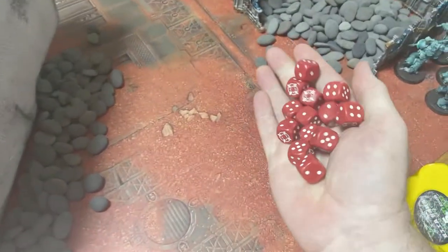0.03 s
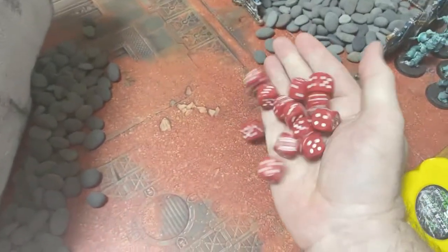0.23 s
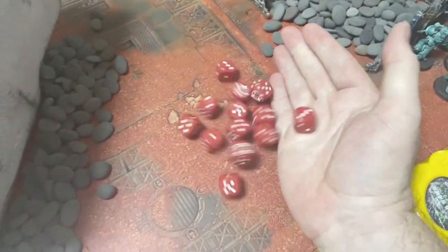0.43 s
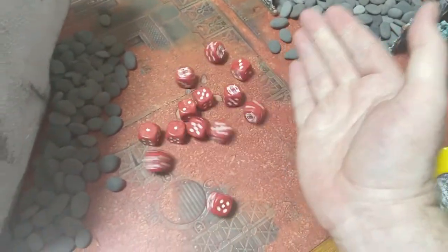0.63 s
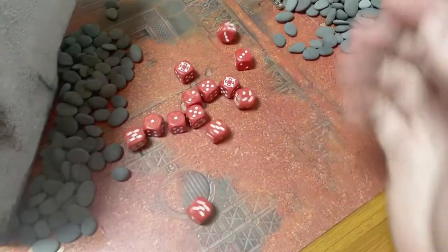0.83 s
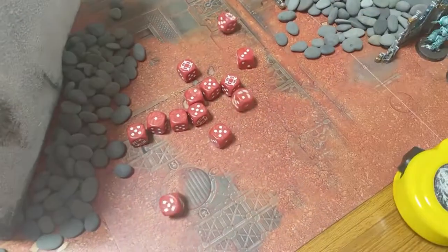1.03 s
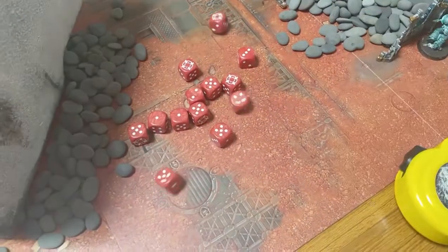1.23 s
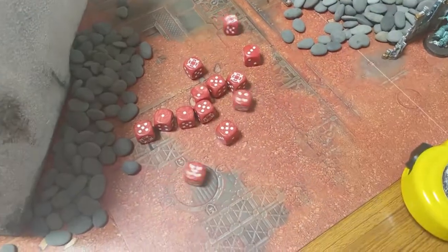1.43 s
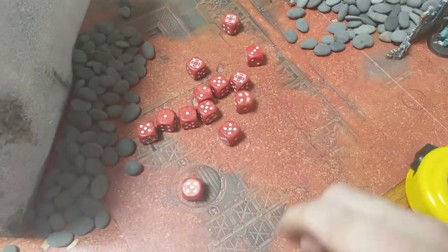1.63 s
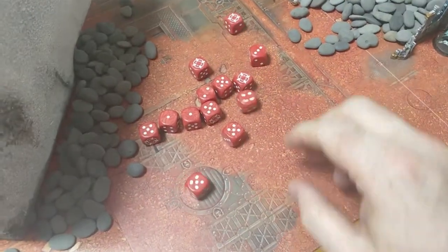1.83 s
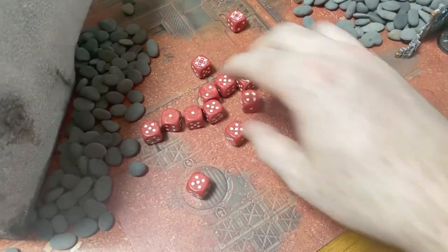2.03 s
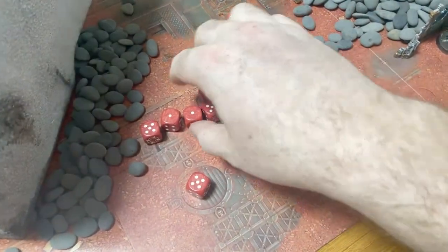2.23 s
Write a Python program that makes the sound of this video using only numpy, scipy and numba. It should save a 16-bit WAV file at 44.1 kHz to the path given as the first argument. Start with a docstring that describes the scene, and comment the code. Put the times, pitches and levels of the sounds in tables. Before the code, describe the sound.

A handful of small plastic dice clacks together, clatters onto a matted table and settles with taps

```python
"""A handful of small plastic dice slides off a palm: they clack together as short clusters of decaying
sines, then land on a mat-covered table and tumble to rest as rings of the struck spot and the table top.
One die spins on with soft taps over a faint rumble of tiny contacts; a hand rustles and brushes the mat.
A phone held above hears it with a short noise-tail echo and shaped-noise room hiss."""
import sys
import numpy as np
from scipy import signal
from scipy.fft import rfft, irfft, next_fast_len
from scipy.io import wavfile
from numba import njit

SR = 44100
rng = np.random.default_rng(int(sys.argv[2]) if len(sys.argv) > 2 else 0)


def decibels_to_gain(level_db):
    """Convert a level in decibels to a linear amplitude gain (20 dB per decade)."""
    exponent = np.asarray(level_db, float) / 20
    return 10 ** exponent


def store_wav(level_fs):
    """Save 16-bit WAV to argv[1]."""
    pcm = np.round(np.clip(np.atleast_2d(level_fs), -1, 1) * 32767)
    wavfile.write(sys.argv[1], SR, pcm.T.astype(np.int16))


N = 101429  # length in samples


@njit
def ring(start, hz, t60, rise, size, phase):
    """Sum of decaying sines, each swelling in over its rise time and cut off after its t60."""
    out = np.zeros(N)
    for k in range(len(hz)):
        turn = np.exp(2j * np.pi * hz[k] / SR - np.log(1000) / (t60[k] * SR))
        wave = size[k] * np.exp(1j * phase[k])
        unrisen, rise_step = 1., np.exp(-1 / (rise[k] * SR))
        for i in range(max(start[k], 0), min(N, start[k] + int(t60[k] * SR))):
            out[i] += wave.imag * (1 - unrisen) ** 2
            wave, unrisen = wave * turn, unrisen * rise_step
    return out


def curve(table, at, log=False):
    """Straight lines between table points, -120 dB outside them."""
    x, y = np.array(table, float).T
    if log:
        x, at = np.log(x), np.log(at)
    return np.interp(at, x, y, -120, -120)


def colour(x, table):
    """Filter by a spectrum, rms gain 1 for white noise."""
    n = next_fast_len(len(x))
    hz = np.arange(1, n // 2 + 2) * SR / n
    gain = decibels_to_gain(curve(table, hz, log=True))
    gain = gain / np.sqrt(np.mean(gain ** 2))
    return irfft(rfft(x, n) * gain, n)[:len(x)]


def bursts(s, db, t60):
    """White noise under a sudden, decaying envelope at each time."""
    strikes = np.zeros(N)
    np.add.at(strikes, (s * SR).astype(int), decibels_to_gain(db))
    envelope = signal.lfilter([1], [1, -np.exp(-np.log(1000) / (t60 * SR))], strikes)
    return envelope * rng.standard_normal(N)


def modes(s, db, hz, t60, rise, scatter_rad=2 * np.pi):
    """Ringing modes with random phases: rows of events by columns of modes."""
    grids = np.broadcast_arrays(s[:, None] * SR, hz, t60, rise, decibels_to_gain(db))
    start, *settings = [v.ravel().astype(float) for v in grids]
    return ring(start.astype(np.int64), *settings, scatter_rad * rng.random(len(start)))


def scatter(per_s, table, spread_db, lo_hz, hi_hz):
    """Random small contacts that follow a level curve, a few standing out: times, dB, pitch."""
    begin, length = table[0][0], table[-1][0] - table[0][0]
    when, strength, pitch = rng.random((int(per_s * length), 3)).T
    s = begin + when * length * .999
    db = curve(table, s) - spread_db * np.log(1.02 - strength)
    return s, db, lo_hz * (hi_hz / lo_hz) ** pitch


def lagged(rows):
    """Event columns, all times shifted by one small constant."""
    lag_s = 0.001015
    return (np.array(rows) + [lag_s, 0, 0]).T


# spectrum of the room hiss: f/Hz, level/dB (per Hz, relative)
HISS_SPECTRUM = [(25, 4), (50, -8), (250, -4), (400, -18), (2000, -17.5), (3700, -27), (4300, -7),
                 (5500, -4), (7000, -17), (9500, -30), (13800, -16.5), (15200, -31)]


def room_hiss():
    """Steady white noise shaped by the spectrum of the room."""
    hiss_db = -54.5  # rms
    return decibels_to_gain(hiss_db) * colour(rng.standard_normal(N), HISS_SPECTRUM)


def clacks(s, db, hz, count=6):
    """A cycle or two of air pushed by two small hard bodies, broad around its pitch, then near reflections."""
    hit_t60_s, hit_db = 0.0033, -1.5
    near_delay_s, near_t60_s, near_db = 0.00077, 0.046, -24.5
    # one mode in each slice of a span reaching further below the pitch than above
    octaves = 1.95 * ((np.arange(count) + rng.random((len(s), count))) / count - .68)
    mode_db = db[:, None] + hit_db - 7 * octaves ** 2
    # phases kept close together, so the modes push as one
    hit = modes(s, mode_db, hz[:, None] * 2 ** octaves, hit_t60_s, 0.0002, scatter_rad=1.15)
    near = bursts(s + near_delay_s, db + near_db, near_t60_s)
    band = signal.butter(3, [1600., 9500.], "band", fs=SR, output="sos")
    return signal.sosfilt(band, hit + near)


# hard clacks of die against die, and a few faint late snaps with the taps:
# t/s before the constant lag, level/dB, f/Hz
HARD_CLACKS = [(0.0924, -22, 5440), (0.0992, -6.5, 5960), (0.1085, -18, 5950), (0.1171, -17.5, 5100),
               (0.1285, -40, 4900), (0.1456, -16, 4750), (0.1594, -15, 4800), (0.1855, -15, 4100),
               (0.2059, -4, 5700), (0.2389, -8, 4600), (0.2698, -0.5, 4370), (0.3222, -6, 6497),
               (0.3404, -21, 5148), (0.3591, -7, 4970), (0.402, -5, 4560), (0.4114, -31, 4330),
               (0.5511, -18, 5800), (0.6479, -16, 5640), (0.6694, -15, 8700), (0.6923, -14, 6230),
               (0.829, -21, 4770), (0.9173, -23.5, 5130), (1.3134, -22, 5000), (1.4792, -31, 4300),
               (1.592, -50, 5000), (1.7254, -25, 5070), (1.794, -31, 4320)]


def hard_clacks():
    """Hard clacks of die against die, and a few faint late snaps with the taps."""
    return clacks(*lagged(HARD_CLACKS))


def room_echo(dice):
    """Short room echo: the dice smeared by a dark, decaying noise tail."""
    t60_s, rise_s, top_hz, echo_db = 0.64, 0.0024, 2610, -13
    t = np.arange(SR // 2) / SR
    tail = rng.standard_normal(len(t)) * decibels_to_gain(-60 * t / t60_s) * (1 - np.exp(-t / rise_s))
    tail = signal.lfilter(*signal.butter(2, top_hz, fs=SR), tail)
    tail = tail / np.sqrt(np.sum(tail ** 2))
    return decibels_to_gain(echo_db) * signal.fftconvolve(dice, tail)[:N]


# dice jostling each other: t/s, level/dB
JOSTLE_LEVEL = [(0.099, -32), (.2, -36.5), (.3, -22.5), (.7, -39), (0.901, -51.5)]


def dice_jostle():
    """A dense chatter of small clacks as the dice jostle each other."""
    per_s, spread_db = 240, 4.5
    return clacks(*scatter(per_s, JOSTLE_LEVEL, spread_db, 4000, 7000))


# what the table top radiates: f/Hz, level/dB
TABLE_RADIATION = [(40, -35.5), (235, -11), (400, -6.5), (1400, 6.5), (2050, 9), (2400, 5), (3600, 8)]
# colour of the hard edge contact: f/Hz, level/dB
EDGE_TICK = [(2500, -10), (3500, -30), (4400, -12.5), (6200, -12), (10500, -25.5), (13700, -20.5),
             (16500, -37)]


def knocks(s, db, hz, tick_db, count=20):
    """A short ring at the struck spot, the dense modes and one low mode of the table, and an edge tick."""
    spot_t60_s, spot_rise_s, spot_db = 0.01, 0.00072, 3.5  # t60 at 1400 Hz
    top_t60_s, top_t60_slope, top_rise_s, top_db = 0.061, -0.75, 0.00058, -20  # t60 at 1 kHz
    body_hz, body_t60_s, body_db = 380, .1, -26  # the one clear low mode of the table
    tick_t60_s = 0.019
    level_db = db[:, None]

    # the pitch of the spot and a weaker partner above it
    partner_octaves = 0.29 + .9 * rng.random((len(s), 1))
    pair = hz[:, None] * 2 ** (np.array([0, 1]) * partner_octaves)
    spot = modes(s, level_db + spot_db + np.array([0, -7]), pair, spot_t60_s * 1400 / pair, spot_rise_s)

    # one random mode in each equal slice of pitch from 60 to 3300 Hz
    f = 60 * 55 ** ((np.arange(count) + rng.random((len(s), count))) / count)
    soft_db = -13 * np.clip(np.log2(f / hz[:, None]), 0, 9)  # softer contact loses the upper modes
    radiated_db = curve(TABLE_RADIATION, f, log=True) + 10 * np.log10(f / 1000)
    top_t60 = top_t60_s * (f / 1000) ** top_t60_slope
    top = modes(s, level_db + top_db + radiated_db + soft_db, f, top_t60, top_rise_s)

    body = modes(s, level_db + body_db, body_hz, body_t60_s, spot_rise_s)
    tick = colour(bursts(s, db + tick_db, tick_t60_s), EDGE_TICK)
    return spot + top + body + tick


# dice landing on the table: t/s before the constant lag, level/dB, f/Hz of the spot struck
TABLE_LANDINGS = [(0.219, -1, 1453), (0.24, -0.5, 2160), (0.2705, -2.5, 1200), (0.284, -2.5, 1544),
                  (0.3145, -1.5, 1300), (0.327, -1, 2050), (0.3495, -3, 1516), (0.356, -1.5, 2170),
                  (0.376, -2, 1190), (0.431, 0, 2280), (0.451, -4.5, 1470), (0.463, -4.5, 1480),
                  (0.505, -8, 1510), (0.528, -9, 1408), (0.537, -2, 1500), (0.568, -10, 1340),
                  (0.596, -9, 1840), (0.615, -8, 1250), (0.623, -10.5, 1300), (0.807, -21.5, 1474),
                  (0.851, -20.5, 1320), (0.885, -30.5, 1260)]


def dice_landings():
    """The separate knocks of dice landing on the matted table."""
    return knocks(*lagged(TABLE_LANDINGS), tick_db=-22.5)


# tumbling and rolling on the table: t/s, level/dB
TUMBLE_LEVEL = [(.22, -26), (0.399, -17.5), (0.717, -24), (0.8, -44.5), (.9, -49), (0.981, -92)]


def dice_tumble():
    """A dense run of small knocks as the dice tumble and roll on the table."""
    per_s, spread_db = 320, 2.8
    return knocks(*scatter(per_s, TUMBLE_LEVEL, spread_db, 1024, 1710), tick_db=-21.0)


# faint rumble on the mat, the last dice rolling and spinning: t/s, level/dB
RUMBLE_LEVEL = [(.9, -58), (1.4, -51.5), (1.62, -51.5), (1.8, -52.5), (2.002, -53.5), (2.3, -54.5)]


def mat_rumble():
    """Many tiny contacts on the mat, without a tick."""
    per_s, spread_db = 450, 3.2
    return knocks(*scatter(per_s, RUMBLE_LEVEL, spread_db, 414, 1955), tick_db=-np.inf)


# soft taps of the last spinning die: t/s before the constant lag, level/dB, f/Hz
SPIN_TAPS = [(0.952, -31, 763), (1.057, -31, 810), (1.159, -36.5, 663), (1.255, -29.5, 870),
             (1.336, -28, 980), (1.412, -31, 730), (1.481, -27, 964), (1.536, -33, 740),
             (1.568, -28.5, 1450), (1.592, -28.5, 855), (1.599, -27, 1390), (1.639, -31.5, 990),
             (1.685, -29.5, 1080), (1.765, -29, 1250), (1.795, -32, 970), (1.824, -30, 1900)]


def spinning_die_taps():
    """Light knocks of the one die that spins on."""
    return knocks(*lagged(SPIN_TAPS), tick_db=-20.5)


# the hand rustles at the table edge, then brushes the mat as it reaches in: t/s, level/dB
BRUSH_LEVEL = [(1.811, -63), (1.839, -38.5), (1.93, -80), (2.1, -60), (2.3, -43.5)]


def hand_brush():
    """Rustle and brush of the hand as many tiny contacts without a tick."""
    per_s, spread_db = 250, 3.2
    return knocks(*scatter(per_s, BRUSH_LEVEL, spread_db, 1170, 1800), tick_db=-np.inf)


def scene():
    """All dice and the hand, a short room echo and the room hiss."""
    dice = hard_clacks() + dice_jostle()
    dice = dice + dice_landings() + dice_tumble()
    dice = dice + mat_rumble() + spinning_die_taps()
    dice = dice + hand_brush()
    return (dice + room_echo(dice) + room_hiss())[None]


def roll_off(x):
    """The treble ends steeply here."""
    return signal.sosfilt(signal.butter(12, 16500, fs=SR, output="sos"), x)


def record(dry):
    """The phone rounds the loudest peaks and cuts the top."""
    limit, top_hz = .75, 16000  # limit in full scale
    rounded = limit * np.tanh(dry / limit)
    cut = signal.ellip(8, .2, 70, top_hz, fs=SR, output="sos")
    mix = signal.sosfilt(cut, rounded)
    return roll_off(mix)


dry = scene()
out = record(dry)
store_wav(out)
```